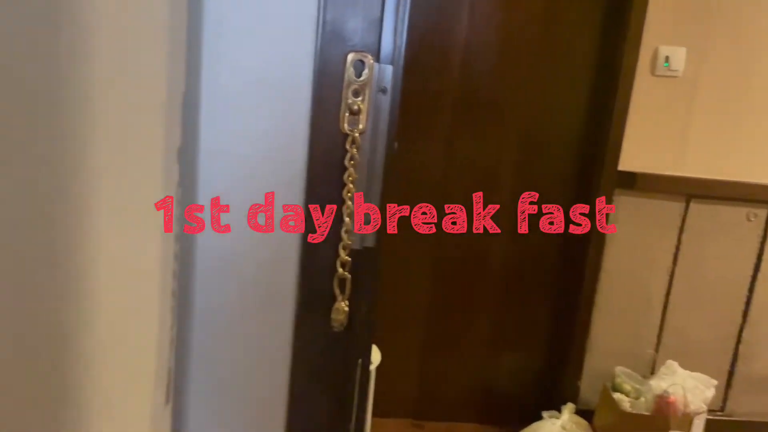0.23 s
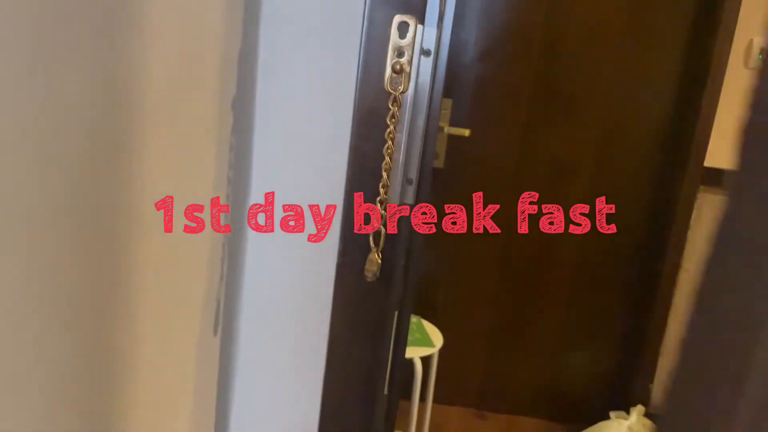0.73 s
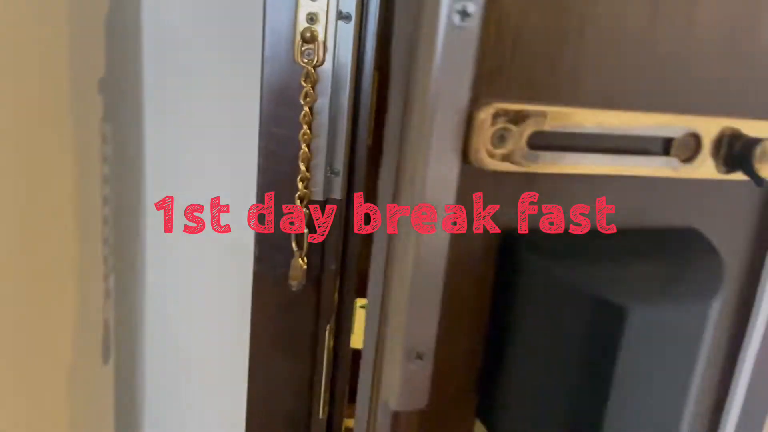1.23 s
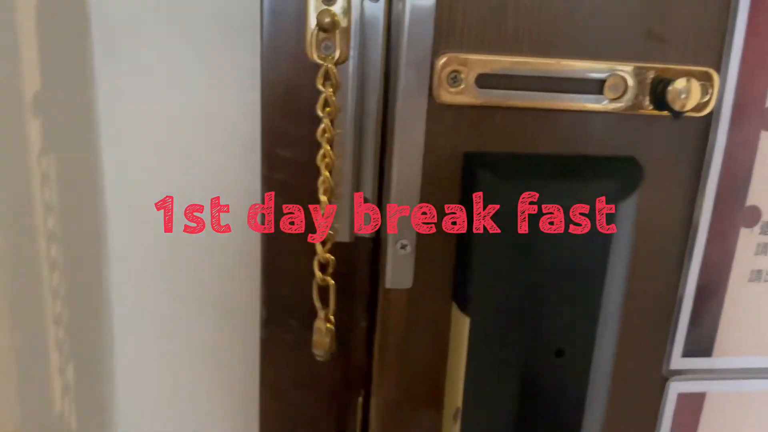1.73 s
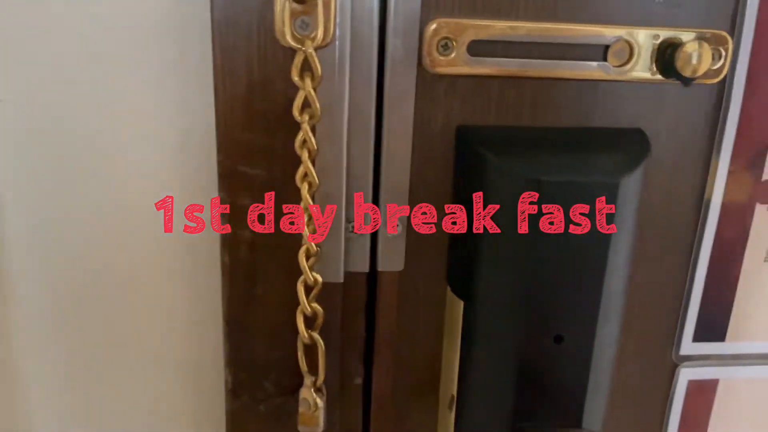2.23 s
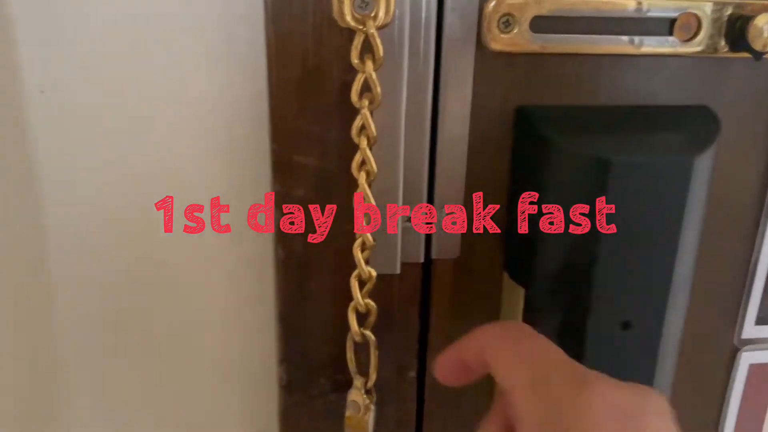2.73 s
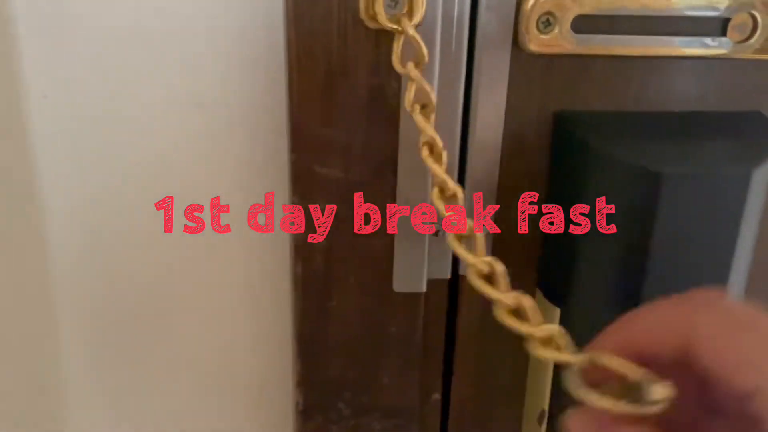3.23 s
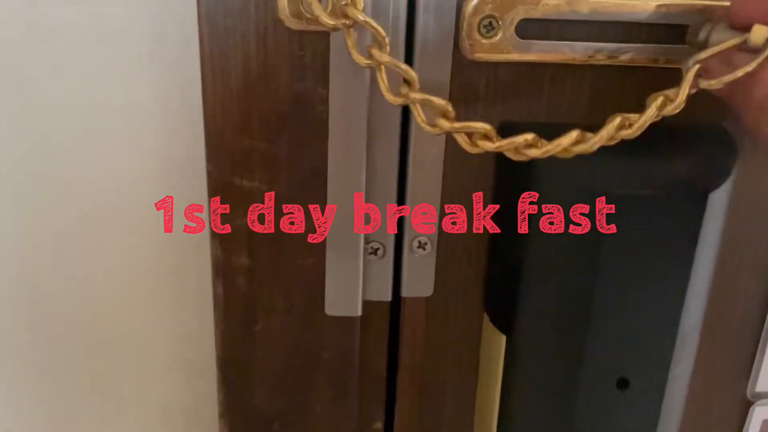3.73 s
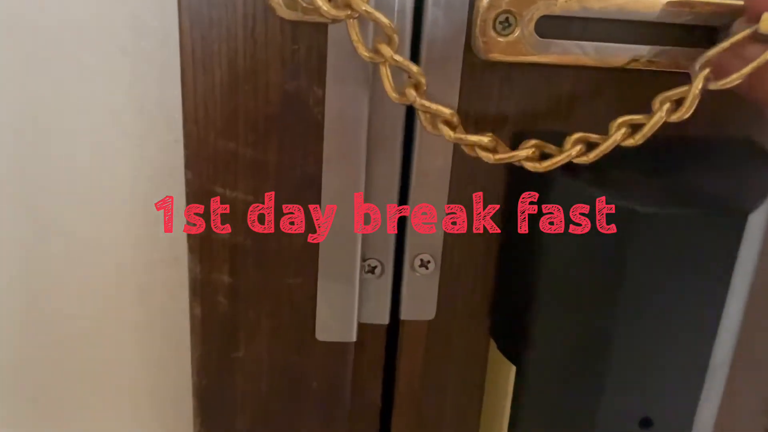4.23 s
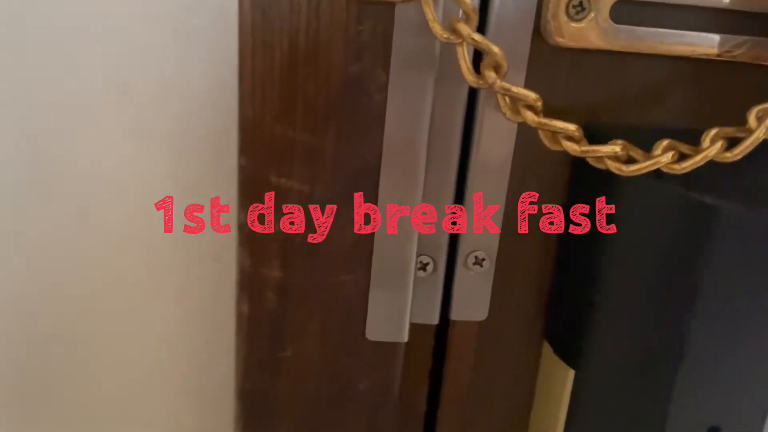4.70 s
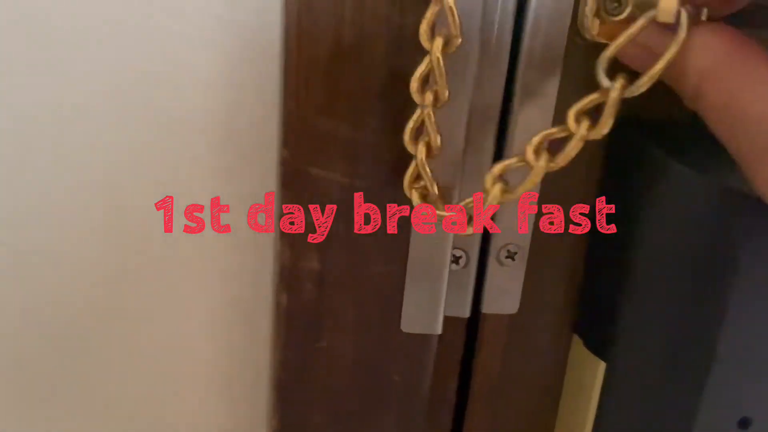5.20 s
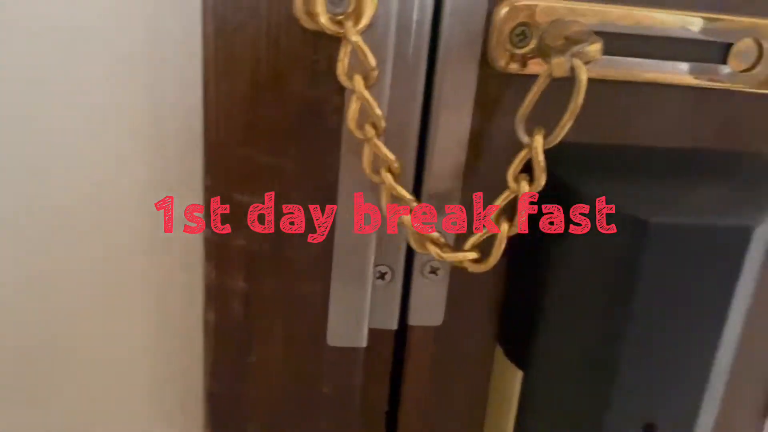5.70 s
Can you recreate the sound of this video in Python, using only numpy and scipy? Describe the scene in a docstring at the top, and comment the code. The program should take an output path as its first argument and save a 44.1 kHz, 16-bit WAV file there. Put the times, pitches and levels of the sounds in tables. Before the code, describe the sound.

Close up, a door closes in a few hard clunks over a low vent hum, followed by lighter metallic taps and short sliding rattles of a chain.

```python
"""A heavy room door swings shut and latches with booming thuds, close to a handheld phone: each blow is a sum of
damped modes of the leaf, and dry clicks are noise bursts coloured by lock resonances. Then a hand lifts the
door's brass chain, knocks the stud on the slotted plate (noise bursts and plate modes) and slides it along
(dense slips through resonances). An air vent hums (shaped noise, fan tone, mains hum); cloth rustles (hiss)."""
import sys
import numpy as np
from scipy import signal
from scipy.fft import rfft, irfft, next_fast_len
from scipy.io import wavfile
from scipy.ndimage import uniform_filter1d, map_coordinates

SR = 44100
rng = np.random.default_rng(int(sys.argv[2]) if len(sys.argv) > 2 else 0)


def decibels_to_gain(level_db):
    """Convert a level in decibels to a linear amplitude gain (20 dB per decade)."""
    exponent = np.asarray(level_db, float) / 20
    return 10 ** exponent


def file_out(sig):
    """Save sig as 16-bit WAV at sys.argv[1]."""
    # one column per channel
    cols = np.atleast_2d(sig).T
    # limit, then scale
    lim = np.clip(cols, -1, 1)
    pcm = np.round(lim * 32767).astype(np.int16)
    wavfile.write(sys.argv[1], SR, pcm)


N = 262483  # length in samples


def unit(x):
    """Normalisation: scales a signal to rms 1."""
    return x / np.sqrt(np.mean(x ** 2, axis=-1, keepdims=True) + 1e-20)


def along(points, hz):
    """Logarithmic frequency scale: reads (frequency [Hz], value) points between their rows."""
    f, value = np.transpose(points)
    return np.interp(np.log(hz + 1), np.log(f + 1), value)


def level(rows):
    """Amplitude envelope: gain per sample from (time [s], level [dB]) rows, -120 dB outside them."""
    s, db = np.transpose(rows)
    return decibels_to_gain(np.interp(np.arange(N) / SR, s, db, left=-120, right=-120))


def wobble(rate):
    """Slow random modulation: a smooth curve through random knots, rate of them a second."""
    knots = rng.standard_normal(int(N * rate / SR) + 4)
    return map_coordinates(knots, [np.arange(N) * rate / SR])


def filtered(x, response):
    """Linear filtering: multiplies the spectrum of x by a complex response of frequency."""
    m = next_fast_len(x.shape[-1] + 8192)
    hz = np.fft.rfftfreq(m, 1 / SR)
    return irfft(rfft(x, m) * response(hz), m)[..., :x.shape[-1]]


# likeness of diffuse sound at the two ports: (frequency [Hz], left-right correlation [-1 to 1])
LIKENESS = [(30, 0.92), (60, 0.98), (130, 1), (270, 0.67), (590, -0.7), (1250, -0.014), (3000, -0.051),
            (8000, 0.19), (9500, -0.84), (11500, -0.076)]


def diffuse(spectrum, patchy_db):
    """Diffuse-field coherence: stereo noise with set left-right likeness, patchy gain and a mean of rms 1."""
    z = signal.stft(rng.standard_normal((2, N)), nperseg=512)[2]
    field = uniform_filter1d(rng.standard_normal(z.shape[1:]), size=5, axis=0)
    field = uniform_filter1d(field, size=10, axis=1)
    patches = decibels_to_gain(patchy_db * field / field.std())
    pair = signal.istft(z * patches, nperseg=512)[1][:, :N]

    def mid_side(hz):
        angle = np.arccos(np.clip(along(LIKENESS, hz), -1, 1)) / 2
        return decibels_to_gain(along(spectrum, hz)) * [np.cos(angle), np.sin(angle)]

    mid, side = filtered(pair, mid_side)
    return np.array([mid + side, mid - side]) / mid.std()


# airflow spectrum: (frequency [Hz], relative density [dB])
AIRFLOW = [(12, -62.5), (20, -28.5), (55, -10), (98, -6), (124, -10), (175, -6.5), (205, -9.5), (260, -13),
           (330, -15), (450, -20), (655, -21.5), (800, -17.5), (1340, -26.5), (5000, -49.5), (6500, -78),
           (11000, -120)]
# fan tone: (time [s], level [dB])
FAN_TONE = [(0, -50), (.6, -43.5), (1.0, -50), (2.1, -41), (5.95, -40.5)]
AIRFLOW_DB, FAN_HZ = -38.5, 231.6


def vent():
    """Flow noise and blade tone: airflow rumble, a fan tone of wandering phase and a wavering mains hum."""
    t = np.arange(N) / SR
    phase = 2 * np.pi * FAN_HZ * t + 0.31 * wobble(22) + 1.45 * wobble(2.5)
    tone = np.sqrt(2) * level(FAN_TONE) * np.sin(phase)
    airflow = decibels_to_gain(AIRFLOW_DB + 0.74 * wobble(2.3)) * diffuse(AIRFLOW, patchy_db=2.2)
    hum_band = lambda hz: 1 / (1 + ((hz - 100) / 4.9) ** 2)
    mains = decibels_to_gain(-43.0) * unit(filtered(rng.standard_normal(N), hum_band))
    return airflow + tone + mains


# cloth and air hiss: (time [s], level [dB])
HISS = [(0, -61), (.25, -54.5), (.45, -60.5), (.9, -57.5), (1.5, -56), (1.8, -56.5), (2.4, -61),
        (2.62, -53), (2.75, -47.5), (2.95, -57), (3.25, -58), (3.38, -56.5), (3.7, -60), (4.5, -62.5),
        (5.3, -60.5), (5.6, -61.5), (5.95, -58.5)]
# hiss spectrum: (frequency [Hz], relative density [dB])
CLOTH_SPECTRUM = [(710, -61), (1200, 5.5), (5590, -4.5), (6050, -6.5), (9000, -11), (9500, -26),
                  (10600, -47.5), (12000, -33.5), (12500, -75), (16200, -103), (22000, -120)]
# spectrum of the top of the rustle: (frequency [Hz], relative density [dB])
AIRY_SPECTRUM = [(6000, -58.5), (8000, 1), (10500, 7.5), (11800, -4.5), (12800, -61)]
AIRY_DB, AIRY_GROWTH = -63, 3.2  # level of the top when the hiss is at -50 dB; dB gained per dB of hiss


def rustle():
    """Friction noise: a thin hiss swells when the sleeve moves, and brightens as it swells."""
    hiss = level(HISS)
    airy_gain = decibels_to_gain(AIRY_DB) * (hiss / decibels_to_gain(-50)) ** AIRY_GROWTH
    cloth = hiss * diffuse(CLOTH_SPECTRUM, patchy_db=2.8)
    airy = airy_gain * diffuse(AIRY_SPECTRUM, patchy_db=3)
    return decibels_to_gain(.8 * wobble(14)) * (cloth + airy)


def resonant(peaks):
    """Second-order resonance: causal response of (centre [Hz], width [Hz], level [dB]) rows, signs alternating."""
    def response(f):
        total = 0
        for k, (c, width, db) in enumerate(peaks):
            total = total + (-1) ** k * decibels_to_gain(db) * 1j * f * width / (c * c - f * f + 1j * f * width)
        return total
    return response


def crack(t, late, low_db, high_db, t60, soft):
    """Contact noise: a gritty burst in three bands, and its build-up, slower for a longer contact."""
    edges = [(500, 2000), (2000, 6000), (6000, 11500)]  # Hz
    bands = [signal.butter(3, pair, "band", fs=SR, output="sos") for pair in edges]
    noise = rng.standard_normal((4, len(t)))
    grit = decibels_to_gain(3.5 * np.repeat(noise[-1], 40)[:len(t)])  # many tiny touches inside one contact
    low, mid, high = [unit(signal.sosfilt(band, x * grit)) for band, x in zip(bands, noise)]
    fade = decibels_to_gain(-60 * late / t60)
    # each band dies at its own pace, the low one slowest
    burst = fade * mid + fade ** 0.99 * decibels_to_gain(high_db) * high + fade ** 0.39 * decibels_to_gain(low_db) * low
    return burst, 1 - np.exp(-(t / (soft * t60)) ** 2)


# dry clicks of latch, links and fingers: (time [s], level [dB], low band re middle [dB],
# high band re middle [dB], left-right [dB] before a common offset)
CLICK_EVENTS = [(0.071, -37, -24, -4.5, 12.5), (0.1086, -42, -5, 2, 13), (0.2004, -30.5, -3.5, -8, 4),
                (0.5003, -45, -23, 3.5, 10.5), (0.5736, -37.5, -1.5, -9.5, 6), (0.889, -40.5, -10, -2.5, 7),
                (0.9715, -37.5, -14, -4, 10.5), (1.096, -44, -7, -21, 8), (1.224, -46, 2, 1, 10.5),
                (1.2615, -40, -3, -16, 16), (1.311, -37, 11, -18, 9.5), (1.321, -36, -1, -19, 1),
                (1.3871, -18.5, 2.5, -23, 2), (1.399, -29.5, -9.5, -14, 4),
                (1.8997, -9.5, -15.5, -7.5, 10.5), (1.9085, -5.5, -9, -5, 2.5), (1.922, -22, -4, -4.5, 4.5),
                (1.938, -23.5, -3, -6, 5.5), (2.2079, -21, -11, 1.5, 14.5), (2.2142, -6, -6.5, -19, 1.5),
                (2.2389, -9, -12.5, -1, 11.5), (2.2442, -29.5, 10, -17, -16.5), (2.257, -36, -12, -6, 7),
                (2.3304, -27, -1.5, -5, 7.5), (2.345, -39, -10.5, -11.5, -0.5), (2.4498, -33, -8, -24, 1.5),
                (2.4778, -33.5, -8, -4.5, 5), (2.57, -34.5, 5, -4, 6), (2.595, -43.5, -3, 3, 12.5),
                (2.823, -51.5, -0.5, 8, 17), (2.925, -34, -2.5, -3, 11), (2.9875, -26.5, -8.5, 0, 5),
                (3.0568, -46.5, 6, 7, 5), (3.075, -44, -8, -6, 8), (3.1037, -38, 0.5, -1, 8.5),
                (3.118, -50, -10, -3, 6), (3.1625, -39, -18, -6, 7), (3.2016, -32.5, -4.5, -1.5, 9),
                (3.286, -40.5, -6, -1, 6), (3.38, -43, -10, -15, 7), (3.5595, -44, -5, 1.5, 8),
                (3.581, -50, -10, 2, 12), (5.8357, -41, -2.5, 4, 7.5)]
# latch and lock case: (centre [Hz], width [Hz], level [dB])
LOCK_RESONANCES = [(760, 56, -4), (1230, 87, -1), (1650, 110, -14), (1885, 170, -2), (2770, 150, -17),
                   (3170, 83, -2), (3870, 61, -2.5), (3820, 100, -11), (4910, 120, -24), (5570, 59, -6),
                   (6590, 130, -16.5)]
CLICK_T60_S, CLICK_DOUBLING_DB = 0.025, 91  # decay of a -43 dB click; extra level that doubles it


def contacts():
    """Resonant colouring: short clicks pass bare and through the small resonances of the lock."""
    out, t = np.zeros((2, N + SR)), np.arange(SR // 4) / SR
    for s, db, low_db, high_db, pan_db in CLICK_EVENTS:
        t60 = CLICK_T60_S * 2 ** ((db + 43.0) / CLICK_DOUBLING_DB)
        burst, onset = crack(t, t, low_db, high_db, t60, soft=0.043)
        gain = decibels_to_gain(db + np.array([[.5], [-.5]]) * (pan_db - 4.5))
        out[:, round((s - .001) * SR):][:, :len(t)] += gain * onset * burst
    return filtered(out[:, :N], lambda hz: decibels_to_gain(-3.0) + decibels_to_gain(4.5) * resonant(LOCK_RESONANCES)(hz))


def ringing(modes, t, scatter_db, apart_db):
    """Modal superposition: damped modes of random strength, uneven at the two ports, neighbours opposed."""
    hz, db, t60 = np.transpose(modes)[:, :, None]
    luck = rng.standard_normal((3, len(modes), 1))
    start = np.arange(len(modes))[:, None] / 2 + .12 * luck[1]  # in cycles
    beams = decibels_to_gain(apart_db * luck[2] * [.5, -.5]).T
    decay = decibels_to_gain(db + scatter_db * luck[0] - 60 * t / t60)
    return beams @ (decay * np.sin(2 * np.pi * (hz * t + start)))


# blows on the door leaf: (time [s], level [dB], strongest frequency [Hz], spread [octaves],
# ring length [share of the mode's t60])
DOOR_BLOWS = [(0.1996, -29.5, 1530, 0.45, 0.35), (0.411, -28, 435, 0.53, 0.98),
              (0.485, -31, 106, 0.16, 0.45), (.743, -20, 577, 0.4, 0.23), (.748, -33, 930, 0.17, 0.55),
              (.752, -15, 317, 0.56, 0.37), (.768, -13, 111.4, 0.3, 0.95), (1.308, -20, 980, 0.76, 1.4),
              (1.324, -18, 503, 1.1, 0.57), (1.37, -18.5, 500, 1.34, 1.2), (1.381, -15.5, 1050, 0.69, 0.35),
              (1.3873, -18, 2900, 0.27, 0.31), (1.386, -0.5, 1000, 0.82, 0.38),
              (1.3875, -2.5, 599, 0.53, 0.39), (1.39, -34, 1780, 0.65, 0.33),
              (1.401, -25, 1290, 0.62, 0.26), (1.411, -25, 1940, 0.17, 0.99), (1.416, -15, 107, 0.36, 1.1),
              (1.694, -24, 111, 1.15, 0.47), (1.908, -20.5, 347, 0.5, 0.43), (1.9088, -15, 1860, 0.28, 0.3),
              (1.912, -25.5, 744, 0.54, 0.53), (1.929, -22, 1010, 0.3, 0.4), (1.914, -9, 95, 0.72, 0.77),
              (2.21, -12.5, 450, 0.33, 1.1), (2.212, -12, 1800, 0.63, 0.59),
              (2.238, -13.5, 1980, 0.35, 0.42), (2.242, -10.5, 620, 0.51, 0.82),
              (2.249, 1, 290, 0.78, 0.28), (2.258, -9, 170, 0.3, 0.47), (2.261, -9, 68, 0.18, 0.71),
              (2.279, -16.5, 1297, 1, 0.83), (2.287, -12.5, 1180, 0.42, 0.71),
              (2.285, -20, 1817, 0.31, 0.51), (2.302, -23.5, 1140, 0.34, 0.15), (2.281, -3, 236, 1.8, 0.51),
              (2.312, -10.5, 129.3, 0.28, 0.16), (2.335, -32, 810, 0.21, 0.98),
              (2.372, -11.5, 205, 1.1, 0.84), (2.41, -13.5, 156, 0.93, 1.3), (2.454, -10, 75.4, 0.61, 1.4),
              (2.481, -16.5, 216, 0.47, 0.34), (2.55, -25.5, 49.5, 0.53, 0.8),
              (3.946, -26, 440, 0.19, 0.73), (3.887, -38.5, 451, 0.6, 0.42), (4.65, -38, 1200, 0.55, 0.4),
              (4.752, -41, 990, 0.7, 0.45), (4.957, -27, 130, 1, 0.2), (5.115, -28, 119, 0.43, 0.27),
              (5.292, -37, 1000, 0.77, 0.5)]
# modes of the door leaf and its frame: (frequency [Hz], level [dB], full t60 [s])
DOOR_MODES = [(43.8, -12.5, 0.45), (60.3, 2, 0.067), (68.4, -8.5, 0.77), (90.4, 5, 0.26), (107.5, -3, 0.64),
              (128.8, -13, 0.27), (159.9, 5.5, 0.39), (176.7, -6.5, 0.99), (197, 10, 0.32), (241, -4, 0.94),
              (283, 6, 0.046), (326, -5, 0.58), (350.5, -8.5, 0.74), (399, 5, 0.23), (451, -7.5, 0.65),
              (480.4, 3.5, 0.097), (614, -1.5, 0.085), (590, 8.5, 0.1), (673, -7, 0.23), (785, -4, 0.22),
              (896, 0.5, 0.028), (907, 0, 0.14), (1008, -14.5, 0.37), (1104, 0.5, 0.015), (1196, 0, 0.11),
              (1311, -0.5, 0.12), (1670, -12, 0.041), (1817, 6, 0.042), (2030, 0, 0.048),
              (2015, -0.5, 0.15), (2356, 6.5, 0.052), (2767, 9.5, 0.076), (2840, -2.5, 0.06),
              (3000, 5.5, 0.074)]
RISE_S, RISE_CYCLES = 0.00082, 0.19  # swell time constant: a fixed part plus cycles of the strongest pitch
THUMP_DB, THUMP_CYCLES = -3.5, 21  # thump of the struck spot re the ring; cycles until it is 60 dB down


def door():
    """Modal excitation: a blow rings the modes near its strongest pitch; low blows swell more slowly."""
    out, t = np.zeros((2, N + SR)), np.arange(SR) / SR
    for s, db, hz, spread, share in DOOR_BLOWS:
        modes = []
        for f, mode_db, t60 in DOOR_MODES:
            detuned_hz = f * (1 + 0.0053 * rng.normal())
            modes.append((detuned_hz, mode_db - 6 * (np.log2(f / hz) / spread) ** 2, share * t60))
        ring = ringing(modes, t, 1.5, 4.0)
        ring = ring / np.abs(ring.mean(axis=0)).max()
        thump = decibels_to_gain(THUMP_DB - 60 * t * hz / THUMP_CYCLES) * np.sin(2 * np.pi * hz * t)
        swell = (1 - np.exp(-t / (RISE_S + RISE_CYCLES / hz))) ** 2
        blow = (ring + thump) * swell
        out[:, round(s * SR):][:, :len(t)] += decibels_to_gain(db) * blow / np.abs(blow.mean(axis=0)).max()
    return out[:, :N]


# air pushed by the closing door: (time [s], level [dB])
AIR_PUSH = [(1.66, -50), (1.9, -35), (2.2, -38), (2.32, -25), (2.6, -34), (2.8, -35), (3.15, -52)]


def push():
    """Volume displacement: the swinging leaf pumps the air of the closed room, as noise around 37 Hz."""
    noise = rng.standard_normal(N) + .25 * rng.standard_normal((2, N))  # mostly common to both ports
    return level(AIR_PUSH) * unit(filtered(noise, lambda hz: np.exp(-((hz - 37) / 11) ** 2)))


# stud and links touch the plate: (time [s], level [dB], low band re middle [dB],
# high band re middle [dB], strongest frequency [Hz])
PLATE_TOUCHES = [(3.6939, -33, 5, -5.5, 3480), (3.733, -36, -18.5, 4.5, 5300), (3.756, -35.5, 1, -14, 4580),
                 (3.7925, -23, -8, 10, 5510), (3.794, -42, 12, -20, 1260), (3.859, -32, 1, -8, 2000),
                 (3.8806, -24.5, 2.5, -29, 2820), (3.8875, -15, -12, -2, 3280), (3.89, -13.5, -3, -5, 1820),
                 (3.906, -39, 0, -8, 2100), (3.9465, -9, -6, -0.5, 3790), (3.948, -14, 0, -14, 1977),
                 (3.962, -34, -8, -13, 2100), (3.976, -36, -0.5, -18, 2300),
                 (4.056, -31.5, -10.5, -5, 6030), (4.104, -28, -4, 5, 4750), (4.188, -30, -7.5, -40, 3050),
                 (4.649, -28.5, -3, 2.5, 2200), (4.6725, -28, -1.5, -16, 4950), (4.679, -36, 3, -23, 1896),
                 (4.692, -49, 4, -24, 1090), (4.7519, -22, -11, -32, 2300), (4.8865, -32.5, 3, 4.5, 2350),
                 (4.8954, -14, -10, -11.5, 2480), (4.9117, -27, -0.5, -29, 2610),
                 (4.9213, -34, 7.5, 18.5, 2400), (4.971, -30, -1.5, -15, 2600), (4.997, -32, 1, 2.5, 2710),
                 (5.0107, -22.5, -4, -3.5, 2780), (5.028, -36, 6, -15, 3000), (5.0638, -25, -1, -21, 2670),
                 (5.077, -24, -5.5, -12, 3030), (5.0839, -27.5, 3.5, 11, 5220), (5.092, -31, 2, -1, 3980),
                 (5.281, -37.5, -20, -10, 5100), (5.2909, -21.5, -8.5, -5, 2780),
                 (5.301, -31.5, 0, -1, 2200), (5.367, -40, 6.5, 2, 4930)]
# modes of the slotted plate: (frequency [Hz], level [dB], t60 [s])
PLATE_MODES = [(440, 2, 0.46), (810, 2.5, 0.15), (1380, -4, 0.18), (1797, -1, 0.15), (1855, 2.5, 0.16),
               (2028, -4, 0.1), (2190, -1.5, 0.16), (2625, -7, 0.15), (2793, -3.5, 0.076),
               (2950, -9.5, 0.049), (3395, -1.5, 0.065), (4085, -0.5, 0.059), (4590, 0, 0.035),
               (4950, -3.5, 0.045), (5350, -4, 0.045), (6114, -1, 0.031), (6800, -24, 0.041),
               (8500, -10, 0.027), (9750, 6.5, 0.03), (10500, 2, 0.025)]
TOUCH_T60_S, TOUCH_POWER = 0.034, 0.58  # decay at 2700 Hz; higher touches die sooner by this power of pitch
FAVOUR_DB, FAVOUR_OCT = 7, 0.48  # strongest pitch re far-off pitches; width of the lift
HOLD_S = 0.0044  # a touch chatters this long before it dies away


def brass():
    """Damped plate modes: a touch rings those near its pitch; fingers damp it fast and a faint ring remains."""
    out, t = np.zeros((2, N + SR)), np.arange(SR // 4) / SR
    late = np.maximum(t - HOLD_S, 0)
    for s, db, low_db, high_db, peak_hz in PLATE_TOUCHES:
        t60 = TOUCH_T60_S * (2700 / peak_hz) ** TOUCH_POWER
        burst, onset = crack(t, late, low_db, high_db, t60, soft=0.035)
        lift = lambda hz: FAVOUR_DB * (np.exp(-(np.log2((hz + 1) / peak_hz) / FAVOUR_OCT) ** 2) - .5)
        colour = lambda hz: along([(1000, low_db), (2500, 0), (8000, high_db)], hz) + lift(hz)
        burst = filtered(burst, lambda hz: decibels_to_gain(lift(hz)))
        modes = [(hz * (1 + .004 * rng.normal()), d + colour(hz), life) for hz, d, life in PLATE_MODES]
        ring = ringing(modes, t, 3.0, 4.0)
        held = decibels_to_gain(-60 * late / (0.97 * t60)) + decibels_to_gain(-20.5)  # finger damping, then the faint remainder
        touch = decibels_to_gain(-12.5) * burst + decibels_to_gain(-11.5) * held * ring
        out[:, round((s - .001) * SR):][:, :len(t)] += decibels_to_gain(db) * onset * touch
    return out[:, :N]


# stud drags on brass: (start [s], end [s], start level [dB], end level [dB], strongest frequency [Hz])
SLIDE_STRETCHES = [(3.853, 3.937, -43.5, -44, 1980), (3.933, 4.004, -42.5, -40, 2200),
                   (4.66, 4.7, -45, -54, 1410), (4.895, 4.976, -31, -40, 2300),
                   (4.986, 5.081, -34.5, -34, 2800), (5.072, 5.097, -40, -29, 4460)]
# resonances of the dragged plate: (centre [Hz], width [Hz], level [dB])
DRAG_RESONANCES = [(490, 90, 1), (810, 190, -0.5), (1350, 500, 1.5), (2000, 140, 2.5), (2200, 400, -3),
                   (2670, 580, -1.5), (3186, 140, -3.5), (3780, 320, -5.5), (5100, 500, -6.5),
                   (6150, 700, -8.5), (9500, 2000, -16)]
SLIPS_PER_S, SCRAPE_DB = 570, -4  # mean rate of link contacts; the smooth scrape under them
GRIP_S, LET_GO_S, LET_GO_DB, FADE_S = 0.027, 0.017, 16.5, 0.11  # build-up; end drop, its depth; fade end


def slide():
    """Stick-slip friction: dense slips excite the plate; each stretch of the slot favours its own pitch."""
    touches = (rng.random(N) < SLIPS_PER_S / SR) * 1.0
    slip_decay = decibels_to_gain(-60 * np.arange(SR // 100) / SR / 0.0048)
    spread = np.convolve(touches, slip_decay)[:N]
    slips = rng.standard_normal(N) * (spread + decibels_to_gain(SCRAPE_DB)) * decibels_to_gain(2.5 * wobble(70))
    out = np.zeros(N)
    for a, b, a_db, b_db, peak_hz in SLIDE_STRETCHES:
        rows = [(a - GRIP_S, a_db - 51.0), (a, a_db), (b, b_db),
                (b + LET_GO_S, b_db - LET_GO_DB), (b + FADE_S, b_db - 36.5)]
        favour = lambda f: decibels_to_gain(12 * np.exp(-(np.log2((f + 1) / peak_hz) / 0.39) ** 2))
        out += level(rows) * unit(filtered(slips, lambda f: resonant(DRAG_RESONANCES)(f) * favour(f)))
    return out


def ports(x, lead):
    """Interaural-type phase difference: a near source reaches the two ports by different paths round the phone."""
    x = x * np.ones((2, 1))
    return filtered(x, lambda hz: np.exp(.5j * along(lead, hz) * np.array([[1], [-1]])))


# decay of the room: (frequency [Hz], t60 [s])
ROOM_DECAY = [(200, .4), (1500, .3), (5000, .24), (8000, .17), (9500, .07), (12000, .05)]


def room(x):
    """Reverberant decay: each frequency dies at its own speed; every eighth of a second has its own tail."""
    out, step = np.zeros((2, N + 2 * SR)), SR // 8
    for start in range(0, N, step):
        hz, t, z = signal.stft(rng.standard_normal((2, SR // 2)), SR, nperseg=256)
        decay = decibels_to_gain(-60 * t / along(ROOM_DECAY, hz)[:, None])
        tail = signal.istft(z * decay, SR, nperseg=256)[1]
        wet = signal.fftconvolve(x[None, start:start + step], tail / np.linalg.norm(tail[0]), axes=1)
        out[:, start + 200:][:, :wet.shape[1]] += wet  # the answer comes 200 samples late
    return out[:, :N]


# phase by which the left port leads, door sounds: (frequency [Hz], lead [rad])
DOOR_LEAD = [(120, 0.101), (250, 1.5), (520, 1.65), (1300, 1.5), (2700, 1.6), (4000, 1.57), (8500, 2.25),
             (12500, 5.3)]
# phase by which the left port leads, plate sounds: (frequency [Hz], lead [rad])
PLATE_LEAD = [(300, -2), (700, -2), (1500, -1.5), (2800, -1.26), (4900, -1.5), (8000, -1.5), (12500, -6)]


def scene():
    """Superposition: near sources, their room tail and the background add."""
    upper = lambda x, edge_hz: filtered(x, lambda hz: hz ** 2 / (hz ** 2 + edge_hz ** 2))
    background = vent() + rustle()
    clicks = contacts()
    leaf = door()
    chatter = (decibels_to_gain(1.2 * wobble(160)) - 1) * upper(leaf, 110)  # the leaf rattles in its frame
    dry_leaf = clicks + leaf + chatter
    dry_plate = brass() + slide()
    near = ports(dry_leaf, DOOR_LEAD) + ports(dry_plate, PLATE_LEAD)
    echo = room(upper(np.mean(dry_leaf + dry_plate, axis=0), 140))  # the deepest bass stays in the door
    return near + decibels_to_gain(-13.0) * echo + push() + background


def low_pass(x):
    """Removes everything above the highest recorded frequency."""
    return signal.sosfilt(signal.butter(12, 12870, fs=SR, output="sos"), x)


# the left port is more open: (frequency [Hz], left-right [dB])
PORT_TILT = [(60, 0), (150, 2.5), (300, 4.5), (700, 2), (2000, 1.5), (6000, 7.5), (9000, 6), (12000, -9)]
# dips of the microphone ports: (centre [Hz], width [Hz], depth [share])
PORT_DIPS = [(5600, 120, 0.93), (7446, 300, 0.78)]


def record(dry):
    """Transducer response and saturation: port colour, a treble limit and a soft ceiling."""
    def response(hz):
        dips = np.prod([1 - share * np.exp(-((hz - c) / w) ** 2) for c, w, share in PORT_DIPS], axis=0)
        tilt = decibels_to_gain(along(PORT_TILT, hz) * np.array([[.5], [-.5]]))
        return dips * tilt / (1 + (hz / 11700) ** 40)  # steep treble limit

    x = filtered(dry, response)
    mix = x / (1 + np.abs(x) ** 6) ** (1 / 6)
    return low_pass(mix)


dry = scene()
out = record(dry)
file_out(out)
```